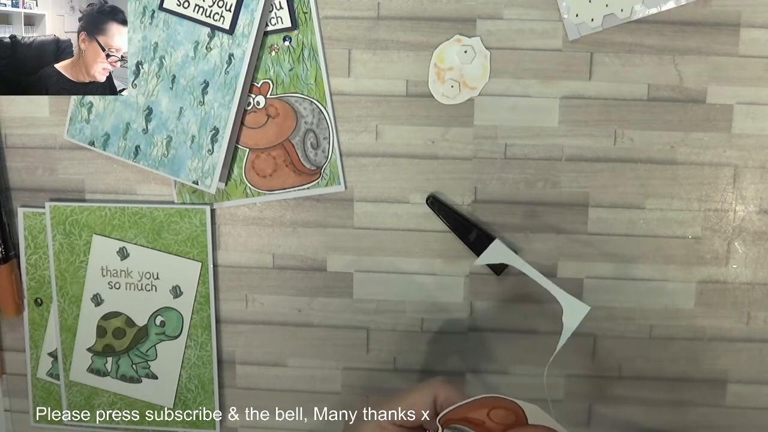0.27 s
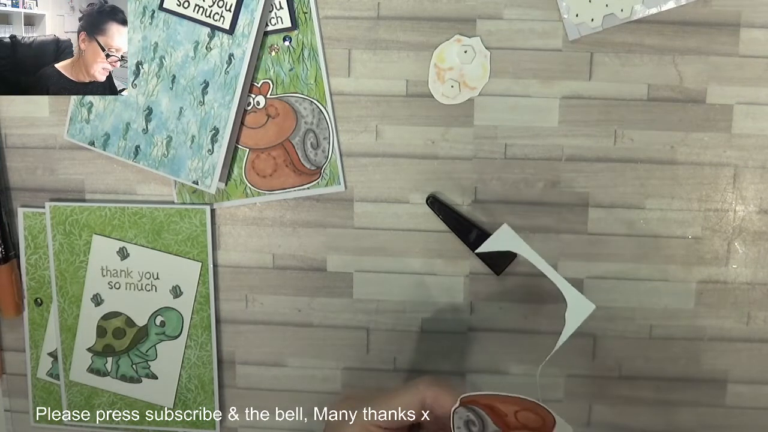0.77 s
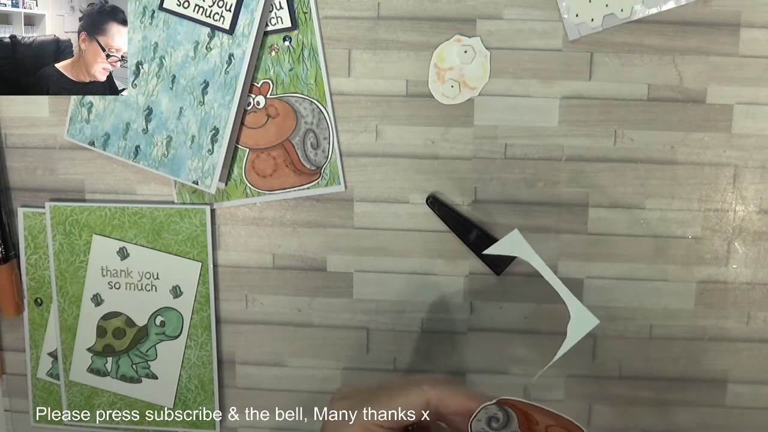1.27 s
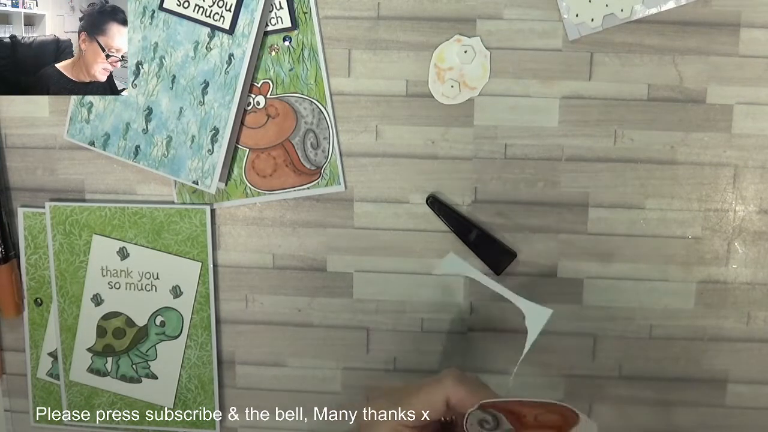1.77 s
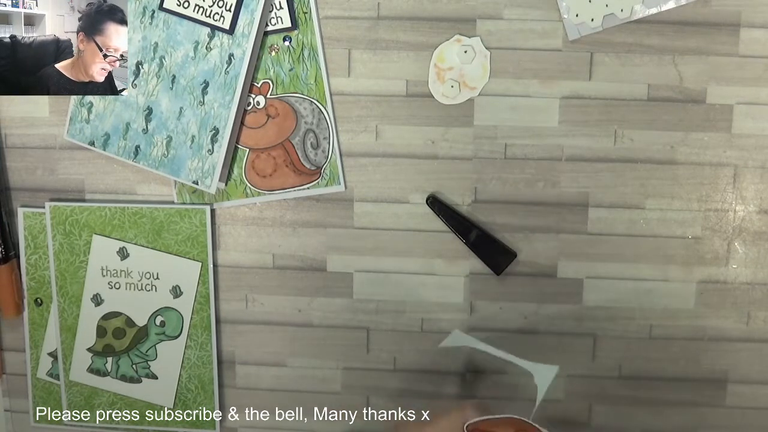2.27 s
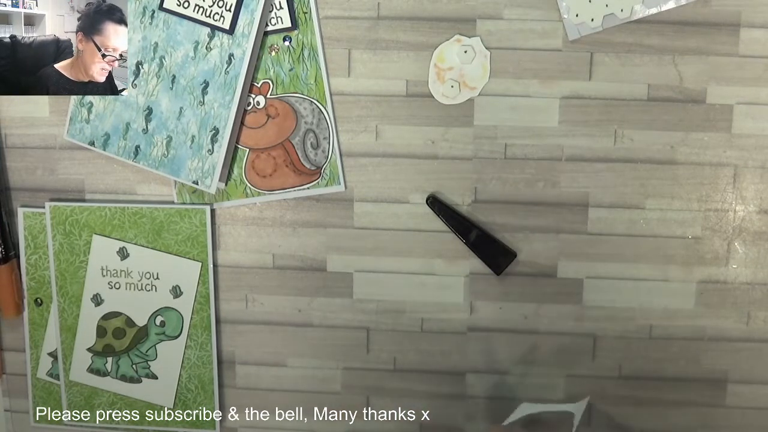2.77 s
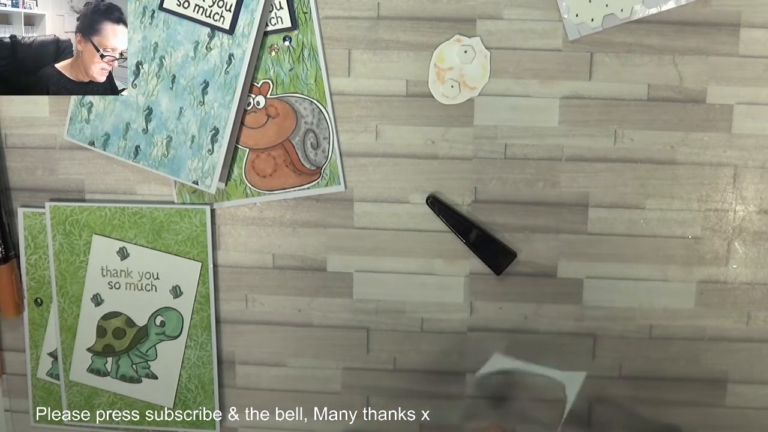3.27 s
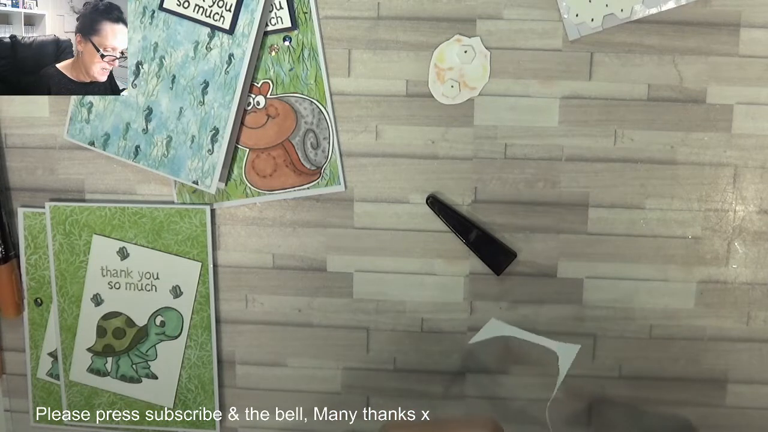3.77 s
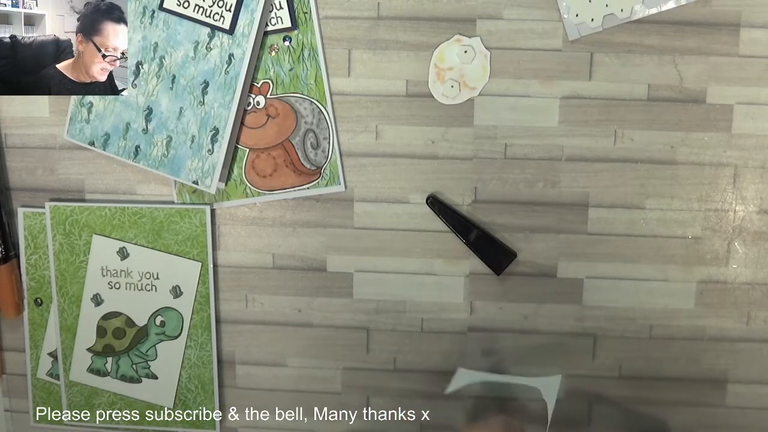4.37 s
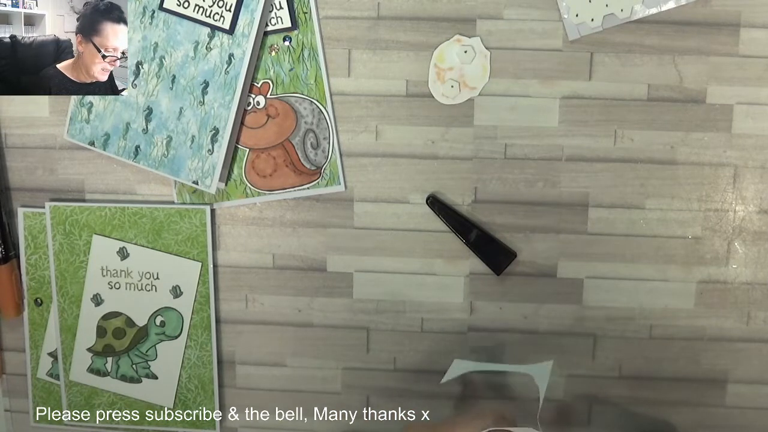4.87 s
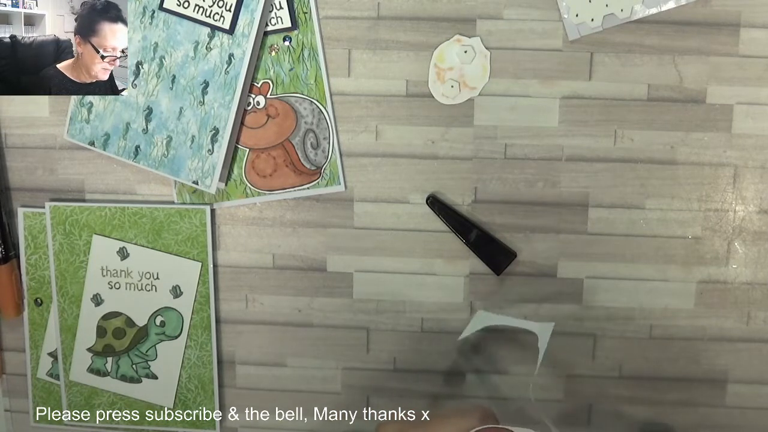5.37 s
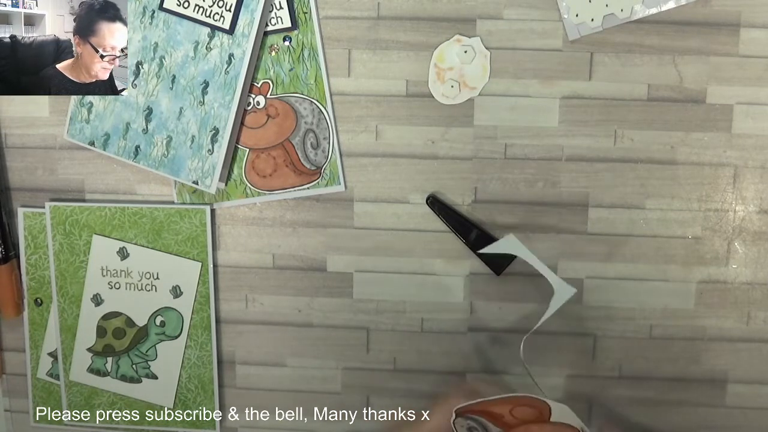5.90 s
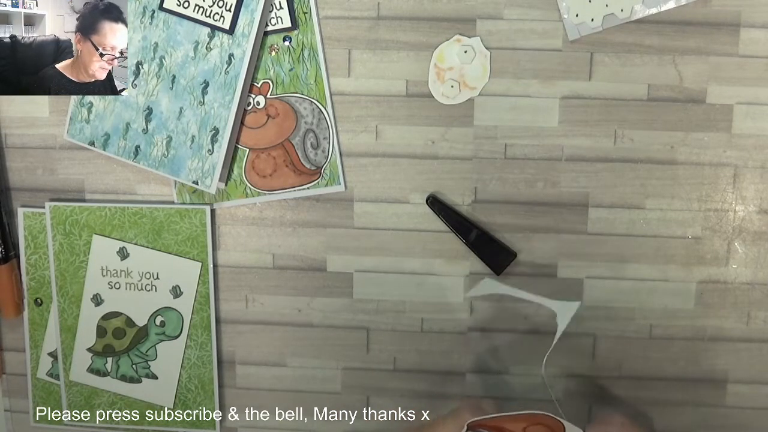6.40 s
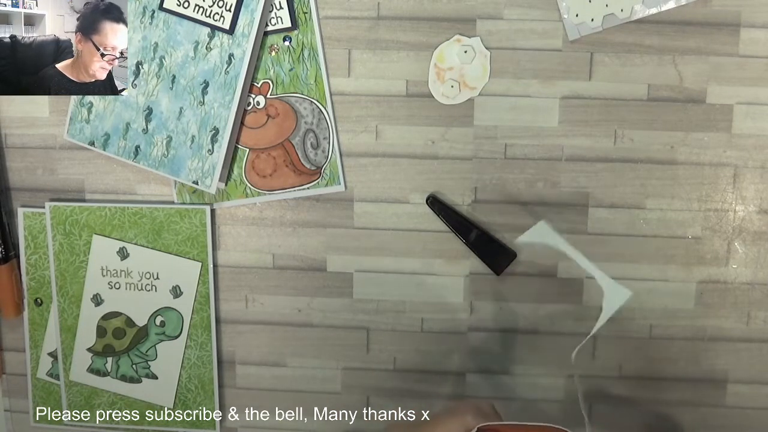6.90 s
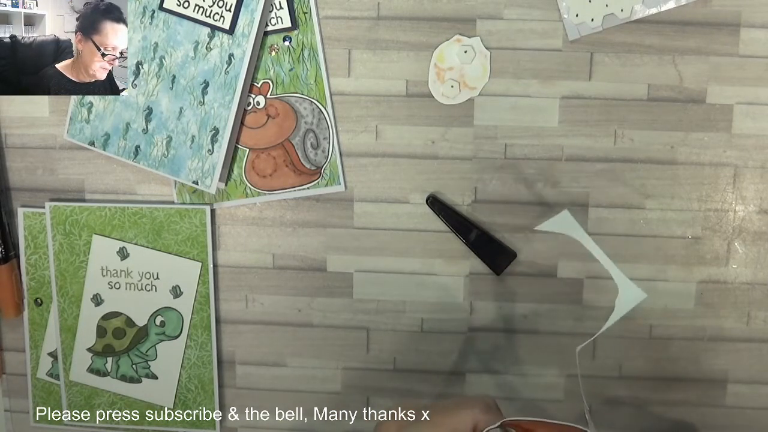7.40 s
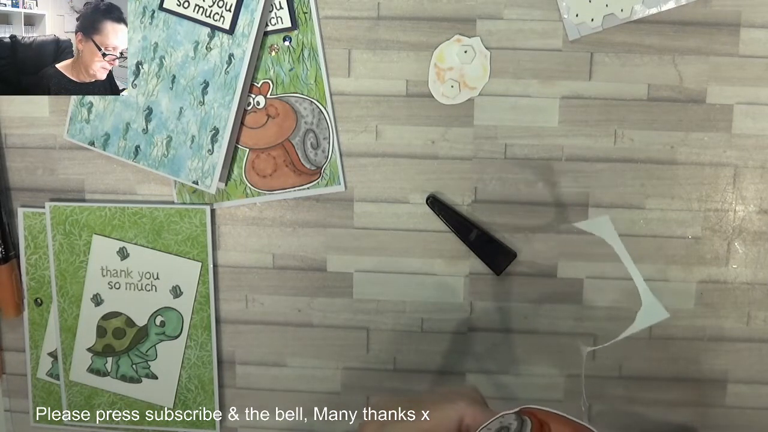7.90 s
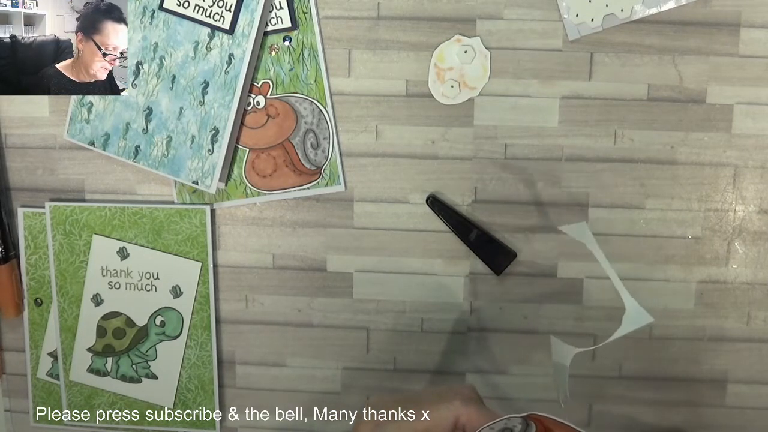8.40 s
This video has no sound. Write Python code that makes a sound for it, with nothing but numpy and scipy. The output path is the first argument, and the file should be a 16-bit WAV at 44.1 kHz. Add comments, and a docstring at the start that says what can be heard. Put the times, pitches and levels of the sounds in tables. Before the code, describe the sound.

A near microphone picks up small blades cutting round a piece of stiff paper above a desk. Light snips open over a soft fan rush and deep hum; the card then slides and squeaks dryly, a sharp clack bursts out, and more rustling fades. Quieter irregular ticks and papery brushes follow, a dull tap past the middle, sparse crackles, and finally firmer snips and a short swish. Room reflections are very short.

```python
"""Fracture and friction in thin card

Small scissors nibble round a picture just above a desk in a small room, over a fan and mains hum.
Each bite is a burst of breaking fibres, filtered by the resonances of the card and its fresh edge.
The card and its dangling offcut slide by noisy friction, sing by stick and slip, and bump softly.
Once there is a hard snap, a sum of decaying modes; short diffuse reflections follow the handwork."""
import sys
import numpy as np
from scipy import signal
from scipy.fft import rfft, irfft
from scipy.io import wavfile

SR = 44100
rng = np.random.default_rng(int(sys.argv[2]) if len(sys.argv) > 2 else 0)


def dump(signal):
    """Clip the signal to [-1, 1] and save it as 16-bit WAV at the path in sys.argv[1]."""
    limited = np.clip(np.atleast_2d(signal).T, -1, 1)
    pcm = np.round(limited * 32767).astype(np.int16)
    wavfile.write(sys.argv[1], SR, pcm)


N = 381465
TIME = np.arange(N) / SR  # s

# Power density of the fan's rush and the thin hiss: frequency_hz, density_db (per Hz)
AIR_SPECTRUM = [(20, -89.5), (70, -97), (120, -95.5), (190, -86.5), (235, -94.5), (275, -87), (370, -86.5),
                (490, -101), (585, -95.5), (680, -105), (750, -102), (1080, -113), (1300, -105),
                (2000, -115), (3500, -122), (16000, -126)]
# Tones of a fan turning about 1000 times a minute, and of the mains: frequency_hz, level_db (rms, before waver)
HUM_TONES = [(16.55, -43.5), (29.9, -70.5), (33.2, -75.5), (38.4, -73), (49.8, -65.5), (83.1, -74.5),
             (99.9, -81.5), (114.7, -77.5), (129.5, -73), (148.0, -71), (166.5, -75), (186.1, -73.5),
             (200.5, -71), (259, -75), (300.8, -78.5), (344.9, -87), (738, -86.5), (886, -92.5),
             (1000, -95), (1175, -91), (1199.5, -95), (1290, -86.5), (1348, -90), (1465, -95)]
ROOM_T60_S, ROOM_DB, ROOM_TOP_HZ = 0.16, -13.5, 8850
DESK_ECHO_S, DESK_ECHO_DB = 0.00072, -21
CUTOFF_HZ = 15750

# Resonances of the held sheet: frequency_hz, width_hz, boost_db
SHEET_RESONANCES = [(1586, 450, 2), (2500, 300, 3), (4650, 1200, 5.5), (6860, 1100, 2), (11440, 950, 1.5)]
# Body, middle and air ranges of the card, one per row: low_hz, high_hz
CARD_RANGES = [(1350, 3460), (3200, 8600), (8600, 14700)]

# Strokes of the card over fingers and desk:
# start_s, length_s, level_db (3-9 kHz, before the slide's gain), body_db (re level), air_db (re level)
CARD_STROKES = [(0.01, 0.035, -76.5, -4, -4), (0.53, 0.37, -80.5, -3, -8), (1.03, 0.3, -81.5, -1, -11),
                (1.494, 0.083, -62.5, -6, -7), (1.698, 0.032, -68, 5.5, -8), (1.753, 0.062, -62, -5, -10),
                (1.838, .025, -61.5, 1.5, -14), (1.915, .02, -75, 7, -11), (2.035, 0.14, -66.5, 4, -9),
                (2.162, 0.043, -59.5, -4.5, -10), (2.219, 0.029, -56, -8.5, -14),
                (2.3, .18, -68.5, -0.5, -8), (3.072, 0.24, -79.5, 3, -8), (3.5, 0.3, -84.5, 0.5, -12),
                (3.83, 0.23, -69.5, 1, -9), (3.895, 0.069, -61.5, -4, -7.5), (4.264, 0.29, -79, 0, -6),
                (4.743, 0.042, -77.5, 0, -3.5), (5.0, 0.14, -84, 2, -2), (5.24, 0.17, -79.5, 0.5, -3),
                (5.56, 0.19, -78, -1.5, -2.5), (5.86, 0.018, -73, -3.5, -8), (5.949, 0.092, -69.5, -2, -6),
                (6.126, 0.026, -75.5, 1, -3.5), (6.5, 0.27, -87.5, 1, -3), (7.38, .2, -89.5, -1.5, -2),
                (8.64, .03, -57, -3, -10)]
# A stroke swells and fades by a factor e in these times; a gentle one (below GENTLE_DB) takes longer.
STROKE_ATTACK_S, STROKE_RELEASE_S, GENTLE_DB, GENTLE_EXTRA_S = 0.012, 0.011, -73, 0.042
HOLDING_DB = -100  # the card never lies quite still in the hand
# Drags in which the edge sings briefly: middle_s, level_db, length_s (middle to either end), pitch_hz, width_hz
EDGE_DRAGS = [(1.578, -71, 0.15, 2770, 600), (1.843, -57.5, 0.019, 3950, 300),
              (1.855, -58.5, 0.033, 1720, 450), (1.857, -57, 0.021, 2410, 400),
              (2.241, -65.5, 0.22, 1580, 550), (2.17, -63.5, 0.038, 860, 250),
              (2.237, -61, 0.041, 5060, 800), (3.903, -63, 0.042, 2720, 450), (3.92, -67, 0.09, 6850, 450),
              (5.98, -72.5, 0.055, 2460, 350)]

# Soft bumps of card and hand: start_s, level_db (relative), pitch_hz, t60_s
SOFT_BUMPS = [(1.781, -46, 1520, 0.019), (1.782, -51.5, 824, .025), (5.668, -55, 260, 0.041),
              (5.666, -45, 555, 0.036), (5.668, -45, 390, 0.03), (5.668, -61, 790, .025),
              (8.154, -45.5, 1840, 0.024)]
SNAP_S, SNAP_DB = 2.0397, -17.5
# Modes rung by the snap: frequency_hz, level_db (re SNAP_DB), t60_s
SNAP_RESONANCES = [(600, -12.5, 0.023), (870, -12.5, .011), (1445, -2, 0.0068), (1800, -8, 0.0082),
                   (2265, -3, 0.015), (2810, -2, 0.0099), (3730, 2, 0.0089), (4210, -3, 0.0077),
                   (5155, 0, 0.01), (6330, 5.5, 0.0059), (6670, 0.5, .007), (7550, -6.5, 0.0087),
                   (8320, -1, .006), (9650, -11, .008), (11000, -11, .006)]

# Spells of fine nibbling with faint random ticks: start_s, end_s, level_db (typical, before the bites' gain)
NIBBLING_SPELLS = [(3.098, 3.35, -66.5), (4.36, 4.8, -68.5), (7.381, 7.55, -66)]
TICKS_PER_S, TICK_SPREAD_DB, TICK_S, TICK_EDGE_HZ = 15, 3, 0.0045, 6900
# Clear bites of the blades and creases of the card:
# middle_s, level_db (3-9 kHz, before the bites' gain), length_s (before stretch), edge_hz (ring of the edge)
CLEAR_BITES = [(0.104, -49.5, 0.0024, 5040), (0.146, -52, 0.0029, 7200), (0.159, -47, 0.0022, 5140),
               (0.513, -58, 0.0019, 7100), (0.76, -58, .0042, 4330), (0.801, -48.5, 0.0019, 6100),
               (0.839, -50, 0.0019, 6400), (1.223, -53, 0.0025, 4400), (1.242, -56.5, 0.0044, 4300),
               (1.631, -60, 0.0017, 2800), (1.657, -62, .002, 2880), (1.708, -42.5, .002, 5360),
               (2.816, -58.5, 0.0084, 2700), (2.824, -57, 0.0062, 2600), (2.864, -58.5, 0.003, 5450),
               (3.039, -62.5, 0.0038, 6950), (3.408, -66.5, 0.008, 8500), (3.467, -70, .007, 7000),
               (3.539, -55.5, 0.002, 2890), (3.563, -64, .0035, 2400), (3.594, -58, 0.0062, 5030),
               (3.81, -63.5, 0.0071, 1900), (3.884, -55, 0.0065, 2800), (4.331, -54.5, 0.007, 7340),
               (4.403, -59.5, .0037, 5870), (4.46, -58, 0.0045, 7400), (4.51, -61, .004, 7000),
               (4.568, -58.5, 0.0029, 5800), (4.624, -67, .003, 7220), (4.729, -63, 0.0034, 6150),
               (4.952, -58.5, .0035, 6800), (4.961, -57.5, .0033, 6900), (4.98, -56.5, .003, 8000),
               (4.986, -58, .004, 5000), (5.017, -55, 0.0023, 5000), (5.027, -62, 0.0037, 7800),
               (5.09, -55.5, 0.0032, 4830), (5.15, -50, 0.0017, 4940), (5.279, -50, .0026, 4440),
               (5.298, -55.5, .003, 4400), (5.342, -50.5, 0.0021, 7500), (5.527, -57, 0.0018, 8400),
               (5.569, -60, .002, 8000), (5.588, -53.5, .0015, 4630), (5.667, -50, .0017, 5200),
               (6.473, -50.5, .004, 2550), (6.52, -59, 0.003, 3800), (6.546, -62.5, 0.0054, 7100),
               (6.615, -65, .003, 3900), (6.67, -60.5, .0034, 7200), (6.771, -67, 0.0028, 2780),
               (7.107, -67, .0045, 7300), (7.128, -65, .0036, 8000), (7.165, -66.5, 0.0028, 2300),
               (7.24, -62, 0.0037, 7440), (7.331, -61.5, 0.0031, 7700), (7.379, -62, 0.0058, 7760),
               (7.422, -59, 0.0028, 5100), (7.669, -61.5, 0.0034, 6350), (7.944, -50.5, 0.0031, 7420),
               (7.979, -51, .0016, 6500), (8.119, -46.5, 0.0032, 2640), (8.136, -59.5, .003, 7360),
               (8.156, -54, 0.0017, 1880), (8.572, -66, 0.0022, 7940)]
# Tone of the bites, shifting as the card is turned in the hand: time_s, body_db (re level), air_db (re level)
BITE_COLOUR = [(0.1, -7, -10), (1.25, -8, -10), (1.7, -8.5, -4.5), (2.8, -1.5, -10), (3.85, -0.5, -8.5),
               (4.45, -4.5, -8.5), (5.3, -4.5, -1.5), (5.59, -5.5, 1), (5.67, -4.5, -9), (6.5, -0.5, -9),
               (7.6, -3.5, -4.5), (7.97, -3.5, -9), (8.13, 1, -4)]
# Upper edge of the bites' air range: time_s, top_hz
BITE_AIR_TOP = [(4.5, 15700), (5.0, 14000), (6.5, 15500), (7.1, 12500), (7.6, 12500), (7.95, 14500)]


def from_db(db):
    """Logarithmic level: decibels become an amplitude gain."""
    return 10 ** (np.asarray(db) / 20)


def rms_one(x):
    """Normalisation: a signal is scaled to unit mean power."""
    return x / np.sqrt(np.mean(x ** 2) + 1e-20)


def band(x, low_hz, high_hz, order=3):
    """Band limitation: a causal filter passes one range of frequencies."""
    edges_hz = [low_hz, min(high_hz, 0.45 * SR)]
    return signal.sosfilt(signal.butter(order, edges_hz, "band", fs=SR, output="sos"), x)


def drift(rate):
    """Random fluctuation: chance values, `rate` a second, are joined by lines and scaled to unit power."""
    knots = rng.standard_normal(int(N / SR * rate) + 2)
    return rms_one(np.interp(TIME * rate, np.arange(len(knots)), knots))


def boost(x, hz, width_hz, gain_db):
    """Resonance: a two-pole peak is added to the sound that excites it."""
    radius = np.exp(-np.pi * width_hz / SR)
    zeros = np.array([1, 0, -1]) * (1 - radius ** 2) / 2
    poles = [1, -2 * radius * np.cos(2 * np.pi * hz / SR), radius ** 2]
    return x + (from_db(gain_db) - 1) * signal.lfilter(zeros, poles, x)


def ring(start_s, hz, t60, rise_s):
    """Damped oscillation: a struck mode swells during the contact, then decays exponentially."""
    age = np.clip(TIME - start_s, 0, 6 * t60)
    return np.sin(2 * np.pi * hz * age) * from_db(-60 * age / t60) * (1 - np.exp(-age / rise_s))


def fibres(size, per_s, spread_db):
    """Random impulses: fibres catch and break by chance, mostly tiny with a few large if spread_db > 0."""
    born = rng.random(size) < per_s / SR
    excess = np.minimum(rng.exponential(1, size), 4)
    return born * rng.standard_normal(size) * from_db(spread_db * excess)


def room_air():
    """Broadband noise: white noise is shaped into the smooth rush of the fan, sinking into a thin hiss."""
    hz, db = np.transpose(AIR_SPECTRUM)
    bins_hz = np.arange(N // 2 + 1) * SR / N
    density_db = np.interp(np.log(bins_hz + 1), np.log(hz), db)
    noise = rfft(rng.standard_normal(N))
    return irfft(noise * from_db(density_db), N) * np.sqrt(SR / 2)


def hum(waver_db=1.0, wander_rad=0.44):
    """Periodic excitation: fan and mains give steady tones that waver a little in level and phase."""
    total = np.zeros(N)
    for hz, db in HUM_TONES:
        amplitude = np.sqrt(2) * from_db(db + waver_db * drift(5))
        phase = 2 * np.pi * (hz * TIME + rng.random()) + wander_rad * drift(1.7)
        total += amplitude * np.sin(phase)
    return total


def room(x, first_echo_s=0.006):
    """Diffuse reverberation: dense, short reflections of a furnished room, dull at the top."""
    age = TIME[:SR // 2]
    tail = rng.standard_normal(len(age)) * from_db(-60 * age / ROOM_T60_S) * (age > first_echo_s)
    tail = band(tail, 200, ROOM_TOP_HZ, order=1)
    return signal.fftconvolve(x, tail / np.sqrt(np.sum(tail ** 2)))[:N]


def sheet(x):
    """Resonant radiation: the card sounds through its resonances and the desk just below sends an echo."""
    for hz, width_hz, gain_db in SHEET_RESONANCES:
        x = boost(x, hz, width_hz, gain_db)
    at = np.arange(len(x))
    return x + from_db(DESK_ECHO_DB) * np.interp(at - DESK_ECHO_S * SR, at, x, left=0)


def turning(x, echo_db=-8, nearest_s=0.000694, travel_s=0.000499):
    """Moving interference: echoes from hands and desk come nearer and recede as the card is turned."""
    echoes = np.zeros(N)
    for k in (1, 2):
        lag_s = nearest_s * k + travel_s * np.abs(drift(2))
        echoes += np.interp(TIME - lag_s, TIME, x)
    return x + from_db(echo_db) * echoes


def stroke_levels():
    """Power addition: strokes swell, hold and fade, giving the gains of the body, middle and air ranges."""
    t = TIME[::32]  # envelopes need only a coarse time step
    power = np.full((3, len(t)), from_db(HOLDING_DB) ** 2)
    for start_s, length_s, level_db, body_db, air_db in CARD_STROKES:
        extra_s = GENTLE_EXTRA_S / (1 + from_db(level_db - GENTLE_DB) ** 2)
        swell = np.exp(np.minimum(t - start_s, 0) / (STROKE_ATTACK_S + extra_s))
        fade = np.exp(np.minimum(start_s + length_s - t, 0) / (STROKE_RELEASE_S + extra_s))
        envelope = from_db(level_db) * swell * fade
        power += np.outer(from_db([body_db, 0, air_db]), envelope) ** 2
    return [np.interp(TIME, t, gain) for gain in np.sqrt(power)]


def slide(gain_db=-1.0, judder_db=2.27, flex_db=-10, crackle_db=-3, crackle_s=0.0012,
          catches_per_s=60, smooth_above_db=-73.0):
    """Sliding friction: fine impulses with slight judder and small catches; flexing adds a dull underside."""
    body, middle, air = stroke_levels()
    snags = (rng.random(N) < catches_per_s / SR) * rng.random(N)
    decay = np.exp(-1 / (crackle_s * SR))
    catches = signal.lfilter([1], [1, -decay], snags + 1e-18)
    # A slow slide catches, a fast one runs smoothly; the stroke's level stands for its speed.
    slowness = 1 / (1 + middle / from_db(smooth_above_db))
    grip = 1 + from_db(crackle_db) * slowness * rms_one(catches)
    friction = turning(sheet(fibres(size=N, per_s=13000, spread_db=0.0)))
    out = from_db(flex_db) * body * rms_one(band(friction, 700, 1400))
    for (low_hz, high_hz), gain in zip(CARD_RANGES, (body, middle, air)):
        out += gain * rms_one(band(friction, low_hz, high_hz))
    return out * grip * from_db(gain_db + judder_db * drift(110))


def drags():
    """Stick and slip: random slips of the edge feed one resonance of the card for the length of a stroke."""
    slips, out = fibres(size=N, per_s=3600, spread_db=2.0), np.zeros(N)
    for middle_s, level_db, length_s, hz, width_hz in EDGE_DRAGS:
        stroke = np.cos(np.pi / 2 * np.clip((TIME - middle_s) / length_s, -1, 1))
        song = rms_one(band(slips, hz - width_hz / 2, hz + width_hz / 2, order=2))
        out += from_db(level_db) * stroke * song
    return out


def bumps(rise_s=0.00057):
    """Soft impact: each entry rings one damped low mode that swells briefly during the contact."""
    return sum(from_db(db) * ring(start_s, hz, t60, rise_s) for start_s, db, hz, t60 in SOFT_BUMPS)


def snap(rise_s=0.00076, crack_db=-15, crack_t60=0.021, rebound_s=0.0007, rebound_db=-12):
    """Hard impact: a bright crack and all modes at once, repeated weakly by a tiny rebound."""
    modes = np.zeros(N)
    for k, (hz, db, t60) in enumerate(SNAP_RESONANCES):
        modes += (-1) ** k * from_db(db) * ring(SNAP_S, hz, t60, rise_s)  # alternate polarity
    age = np.clip(TIME - SNAP_S, 0, 6 * crack_t60)
    noise = rng.standard_normal(N) * (age > 0) * from_db(crack_db - 60 * age / crack_t60)
    crack = band(noise, 5000, 15500, order=1)
    hit = from_db(SNAP_DB) * (modes + crack)
    return hit + from_db(rebound_db) * np.interp(TIME - rebound_s, TIME, hit)


def ticks():
    """Irregular repetition: faint bites at uneven steps through each spell, as rows like the clear bites."""
    rows = []
    for start_s, end_s, level_db in NIBBLING_SPELLS:
        chances = rng.uniform(-1, 1, size=(16, 3))
        for k, (when, strength, pitch) in enumerate(chances):
            middle_s = start_s + (k + 0.5 + when / 2) / TICKS_PER_S
            if middle_s < end_s:
                tick_db = level_db + TICK_SPREAD_DB * strength
                rows.append((middle_s, tick_db, TICK_S, TICK_EDGE_HZ * 2 ** (pitch / 2)))
    return rows


def bites(rows, gain_db=0.5, stretch=1.27, attack_share=0.89, crumble_db=-16, crumble_s=0.0055,
          edge_db=6.0, edge_width_hz=1000, stray_db=2.5, stray_width_hz=400, flex_db=-13):
    """Fracture: breaking fibres swell and crumble away; the fresh edge rings at one main and stray pitches."""
    size, lead = 2048, 700  # samples in a bite, and before its middle
    out = np.zeros(N + 4096)
    age = (np.arange(size) - lead) / SR
    colour_s, *colours = np.transpose(BITE_COLOUR)
    (body_range, middle_range, (air_low_hz, _)) = CARD_RANGES
    for middle_s, level_db, length_s, edge_hz in rows:
        body_db, air_db = [np.interp(middle_s, colour_s, column) for column in colours]
        width_s = stretch * length_s * np.where(age < 0, attack_share, 1)  # at half power
        swell = np.exp(-2 * np.log(2) * (age / width_s) ** 2)
        crumble = from_db(crumble_db) * (age > 0) * np.exp(-np.abs(age) / crumble_s)
        burst = sheet(fibres(size=size, per_s=14000, spread_db=2.0) * (swell + crumble))
        burst = boost(burst, edge_hz, edge_width_hz, edge_db)
        for stray_hz in 2000 * 2 ** rng.uniform(0, 2.75, size=3):
            burst = boost(burst, stray_hz, stray_width_hz, stray_db)
        # The sheet flexes under the blade.
        bite = from_db(body_db + flex_db) * rms_one(band(burst, 760, 1260, order=2))
        air_top_hz = np.interp(middle_s, *np.transpose(BITE_AIR_TOP))
        ranges = (body_range, middle_range, (air_low_hz, air_top_hz))
        for (low_hz, high_hz), range_db in zip(ranges, (body_db, 0, air_db)):
            bite += from_db(range_db) * rms_one(band(burst, low_hz, high_hz))
        at = round(middle_s * SR) - lead
        energy_scale = np.sqrt(length_s * SR / size)  # unit power over the bite's length, not the whole block
        out[at:at + size] += from_db(gain_db + level_db) * bite * energy_scale
    return out[:N]


def scene():
    """Superposition: steady background, handwork close by, and the room's reflections of the handwork."""
    background = room_air() + hum()
    work = slide() + drags() + bumps() + snap() + bites(ticks()) + bites(CLEAR_BITES)
    return (background + work + from_db(ROOM_DB) * room(work))[None]


def record(dry):
    """Low-pass filtering: an elliptic filter cuts the top steeply."""
    return signal.sosfilt(signal.ellip(10, 0.2, 70, CUTOFF_HZ, fs=SR, output="sos"), dry)


dry = scene()
out = record(dry)
dump(out)
```